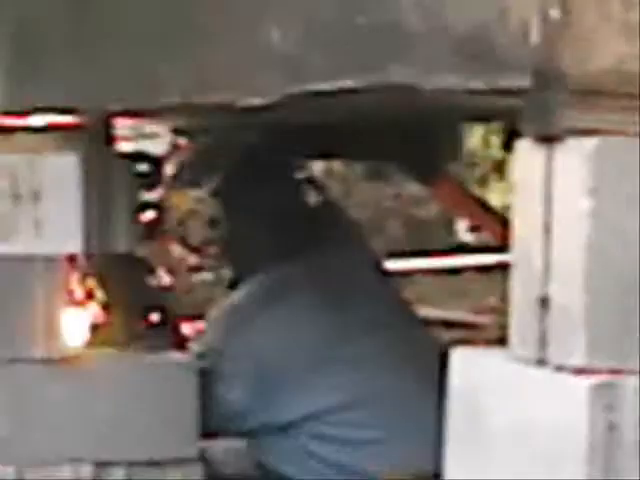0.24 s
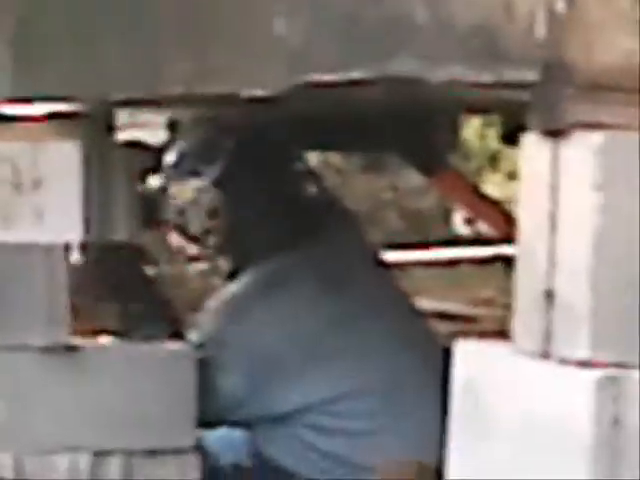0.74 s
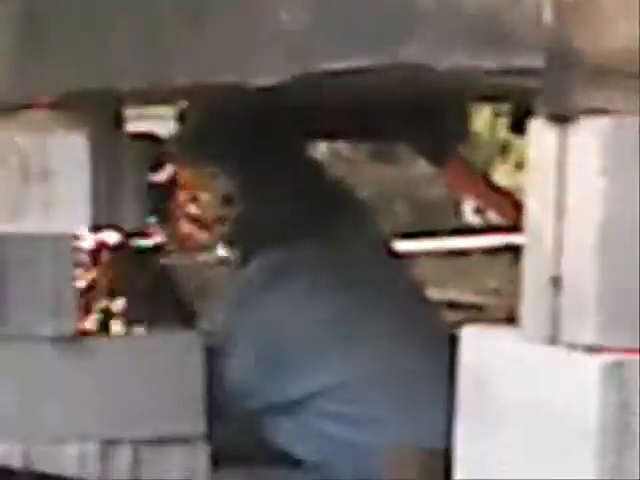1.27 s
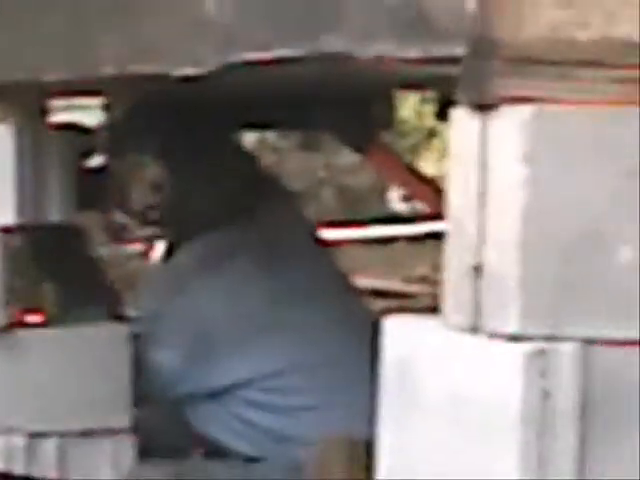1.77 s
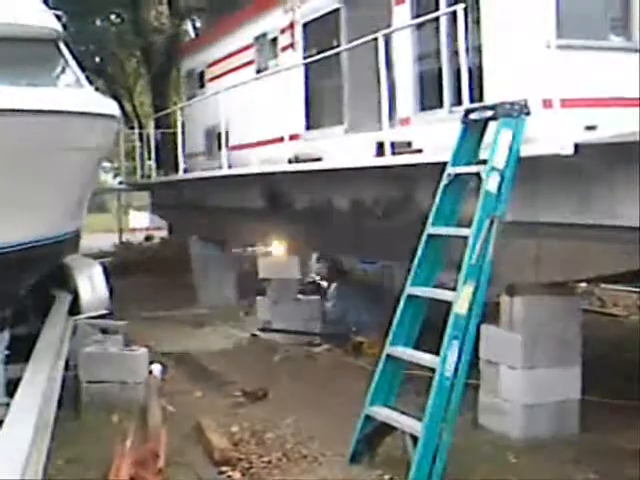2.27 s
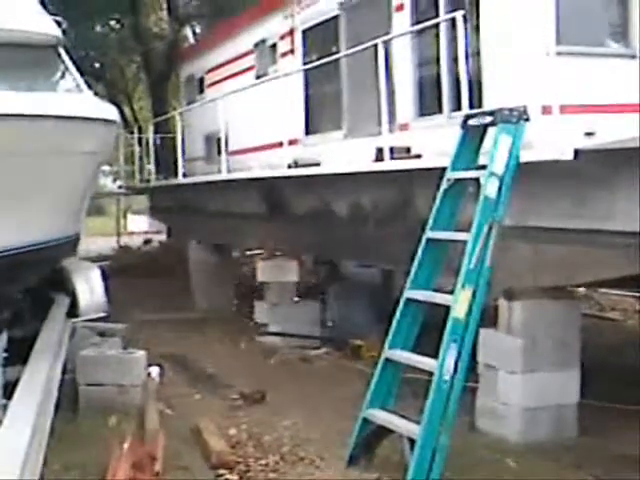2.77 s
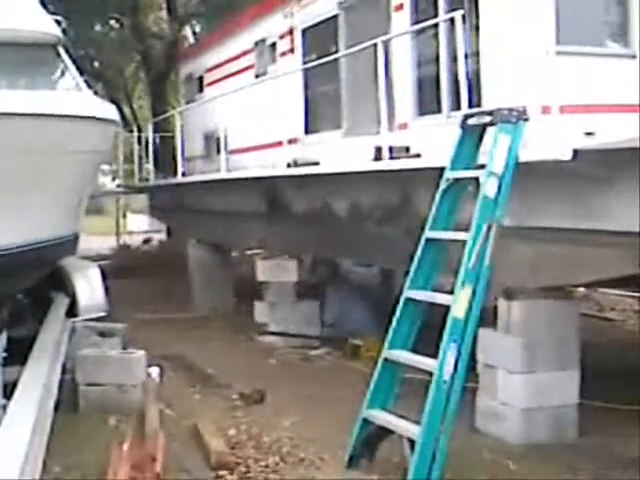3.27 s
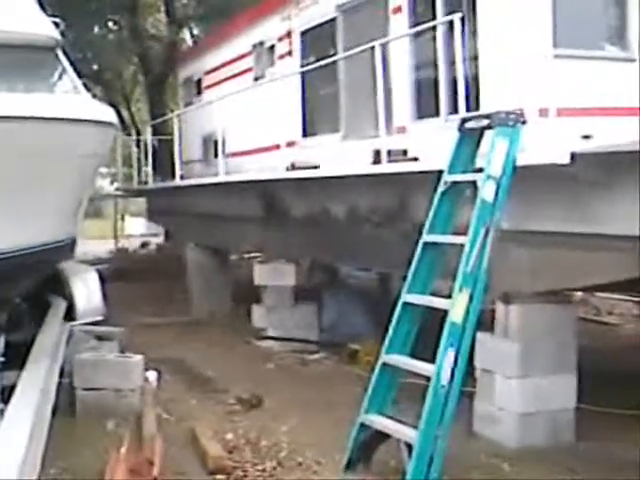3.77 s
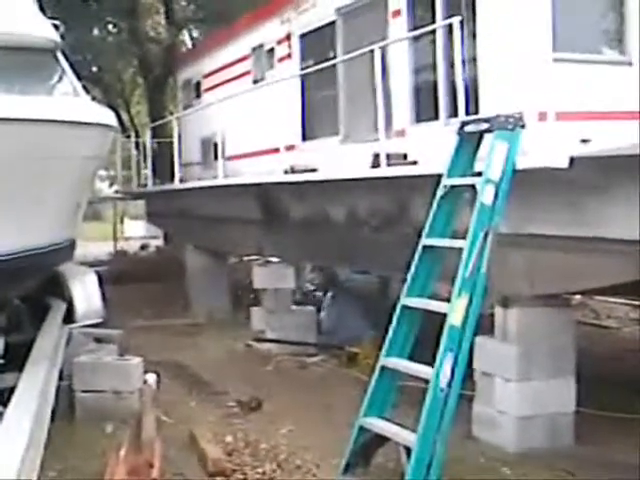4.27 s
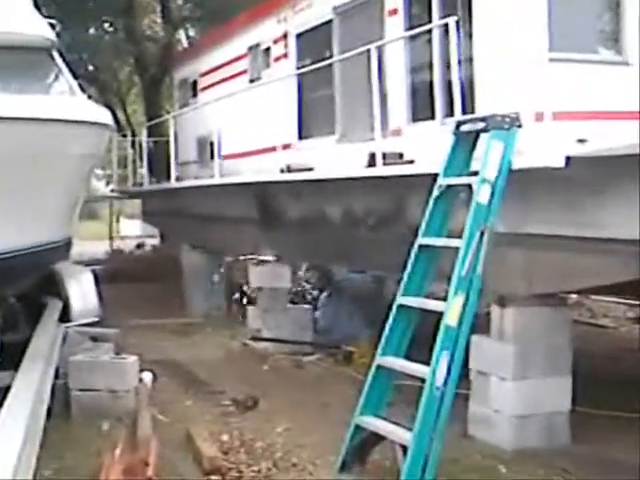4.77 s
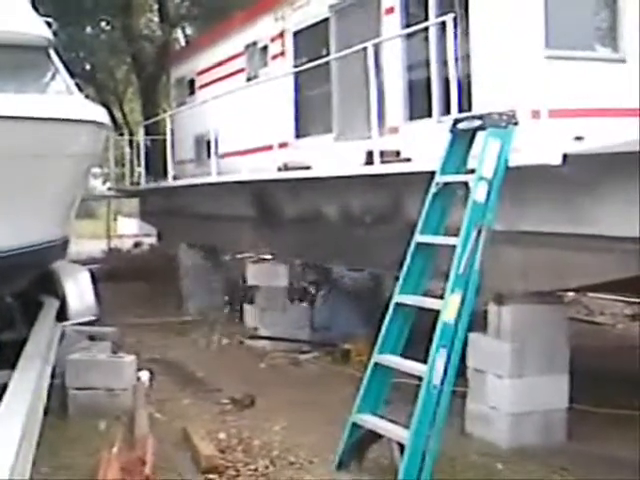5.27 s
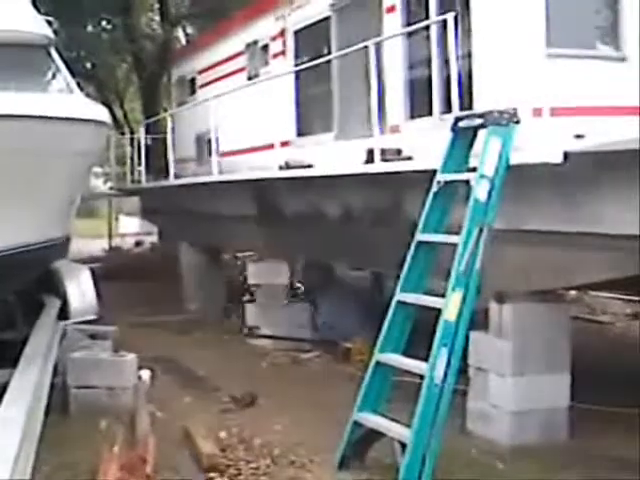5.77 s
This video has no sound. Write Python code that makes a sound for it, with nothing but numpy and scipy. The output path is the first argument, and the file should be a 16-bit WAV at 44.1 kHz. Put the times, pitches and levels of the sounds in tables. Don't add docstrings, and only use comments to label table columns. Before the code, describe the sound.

A single-cylinder engine drones loudly with whirring and clatter, a hard plastic clack, a brief near-silence, then the same engine quieter and farther off.

```python
import sys
import numpy as np
from scipy import signal
from scipy.fft import rfft, irfft, next_fast_len
from scipy.io import wavfile
from scipy.ndimage import uniform_filter1d

SR = 44100
rng = np.random.default_rng(int(sys.argv[2]) if len(sys.argv) > 2 else 0)


def wav_out(sig):
    wavfile.write(sys.argv[1], SR, np.round(np.clip(np.atleast_2d(sig).T, -1, 1) * 32767).astype(np.int16))


def gain_from_decibels(decibels):
    exponent = np.asarray(decibels, float) / 20
    return 10 ** exponent


N = 265482

# (frequency [Hz], density [dB per Hz])
ROAR_NEAR = [(20, -46.5), (75, -30.5), (140, -21), (220, -12), (340, -4.5), (450, -16.5), (600, -13.5),
             (820, -8.5), (1150, -16.5), (1400, -36), (1900, -57)]
ROAR_FAR = [(20, -27), (75, -20), (140, -22.5), (220, -11.5), (310, -5), (420, -8), (550, -14),
            (790, -11.5), (1080, -8), (1400, -19.5), (1900, -59)]
# (frequency [Hz], density [dB per Hz])
CLATTER_NEAR = [(710, -43.5), (1200, -4.5), (1380, -5.5), (1700, -4.5), (2070, -9.5), (2310, -7),
                (2650, -11.5), (3370, -11.5), (4000, -9.5), (5200, -60), (8800, -120)]
CLATTER_FAR = [(710, -46), (1200, -6), (1330, -29), (1420, -16), (1600, -10.5), (1910, -17), (2070, -9.5),
               (2200, -8), (3140, -16), (4000, -13.5), (5200, -66), (8800, -120)]
# (time [s], peak level [dB], decay by 60 dB [s], pitch [Hz], share of ring [0-1])
CLICKS = [
    (.228, -14, .01, 3000, .2),
    (.2638, -4, .018, 1700, .2),
    (.286, -16, .01, 3000, .2),
    (1.8785, -9, .012, 3900, 1),
    (1.8909, 8, .011, 3700, 1),
    (1.8909, 5, .014, 1600, 1),
    (1.8935, 7, .018, 1000, 1),
    (1.8985, -12, .035, 2800, 1),
    (2.2697, -21, .01, 2500, .3),
]
GAP = 2.0018, 2.1287
# (time [s], firing rate [1/s])
SPEED = [
    [(0.0, 28.55), (0.15, 28.95), (0.5, 30.25), (0.78, 30.25), (1.15, 29.3), (1.33, 29.35), (1.5, 30.85),
     (1.86, 31.15)],
    [(2.13, 30.0), (2.71, 29.6), (3.02, 31.15), (3.2, 31.1), (3.98, 30.15), (4.33, 28.85), (4.5, 28.9),
     (4.84, 30.45), (5.6, 29.4), (6.02, 29.95)],
]
# (time [s], level [dB])
LEVEL = [
    [(0.0, -19.5), (1.4, -20), (1.6, -19), (1.88, -18.5), (1.92, -21)],
    [(2.13, -28.5), (2.9, -26), (4.25, -26), (4.6, -24.5), (6.02, -24.5)],
]
# (multiple of firing rate [1], near loaded [dB], near free [dB], far loaded [dB], far free [dB])
EXHAUST = [(1, -33, -29, -34, -28), (2, -11, -8, -13, -10), (3, -15, -16, -16, -14), (4, -3, 0, -4, -1.5),
           (5, 0, -3, 0, -1), (6, -7, -1, -10, 0)]
# (multiple [1], near loaded [dB], near free [dB], far loaded [dB], far free [dB])
PANELS = [(7, -16, -11, -15, -11), (8, -14, 0, -10, -4), (9, -14, -17, -19, -12), (10, -8, -3, -9, -5),
          (11, -9, -11, -11, -13), (12, -7, -5, -12, -4), (14, -17, -13, -10, -4), (22, -12, -10, -19, -16),
          (23, -11, 2, -16, -7), (25, -9, -2, -12, -6), (27, -11, -11, -16, -16), (28, -5, -5, -15, -8),
          (29, -7, -13, -18, -10), (34, -13, -14, -16, -8)]
# (near loaded [dB], near free [dB], far loaded [dB], far free [dB])
OTHER_PANELS = (-15, -15, -17, -15)
# (best firing rate [1/s], loss 1 per s below [dB], loss 1 per s above [dB])
MUFFLER = (29.93, .3, 2.7)
GENERATOR_RING = (30.0, 6.5, 0.55)
COWL_RING = (30.3, 10.8, 3.5)
# (time [s], offset [full scale])
BIAS_SAG = [(1.889, 0), (1.9, -.085), (2.0, -.095)]
# (time [s], level [dB])
GAP_FADE = [(2.0, -38), (2.02, -57), (2.038, -64), (2.042, -130)]
# (frequency [Hz], density [dB per Hz])
GAP_COLOUR = [(50, 0), (900, 0), (2500, -18), (15000, -28)]

TOP_ORDER = 34
GENERATOR, COWL = 20, 26
HOLD_HZ = 8003.16


def engine(spot, roar_colour, clatter_colour, exhaust_db, generator_db, cowl_db, clatter_db, roar_db,
           beat, start):
    speed = curves(SPEED[spot])[0]
    level_db = curves(LEVEL[spot])[0]
    crank = 2 * np.pi * np.cumsum(speed) / SR - start
    stroke = gain_from_decibels(0.78 * wobble(30))
    firing = 1 + beat * np.cos(crank - .4) + 0.087 * np.cos(2 * crank)
    pulses = unit(exhaust(spot, speed, crank) * stroke)
    pulses *= gain_from_decibels(exhaust_db + tuned_db(speed, MUFFLER))
    body = unit(panels(spot, speed, crank) * stroke) + gain_from_decibels(roar_db) * roar(roar_colour, firing)
    whine = whines(speed, crank, generator_db, cowl_db)
    ticks = gain_from_decibels(clatter_db) * clatter(clatter_colour, firing)
    return gain_from_decibels(level_db) * (pulses + whine + gain_from_decibels(3.5) * unit(body) + ticks)


def exhaust(spot, speed, crank):
    opening = np.clip((speed - 29.4) / 1.7, 0, 1)
    out = np.zeros(N)
    for k, *levels in EXHAUST:
        loaded_db, free_db = levels[2 * spot:2 * spot + 2]
        db = loaded_db + opening * (free_db - loaded_db)
        if k < 4:
            lead = .4 + 2.4 * opening - 1.6 * (k == 3)
        else:
            lead = -1.5 * max(k - 5, 0)
        strength = gain_from_decibels(db + .5 * wobble(6))
        out -= strength * np.cos(k * crank + lead + .15 * wobble(5))
    return out


def panels(spot, speed, crank):
    free = np.clip((speed - 30.3) / .6, 0, 1)
    favoured = {k: levels for k, *levels in PANELS}
    out = np.zeros(N)
    for k in range(7, TOP_ORDER + 1):
        if k in (GENERATOR, COWL):
            continue
        loaded_db, free_db = favoured.get(k, OTHER_PANELS)[2 * spot:2 * spot + 2]
        db = loaded_db + free * (free_db - loaded_db)
        spread = np.minimum((k - 6) / 4, 3)
        lag = spread * rng.standard_normal() - 1.5
        strength = gain_from_decibels(1.15 * db + 2.5 * wobble(6))
        out -= strength * np.cos(k * crank + lag + .35 * wobble(6))
    return out / np.sqrt(np.abs(uniform_filter1d(out ** 2, size=SR // 3)))


def whines(speed, crank, generator_db, cowl_db):
    out = np.zeros(N)
    for k, whine_db, ring in [(GENERATOR, generator_db, GENERATOR_RING), (COWL, cowl_db, COWL_RING)]:
        db = whine_db + tuned_db(speed, ring)
        out += gain_from_decibels(db + 1.62 * wobble(7.2)) * np.sin(k * crank + 0.2 * wobble(7.9))
    return out


def button():
    out = np.zeros(N)
    t = np.arange(SR // 10) / SR
    for s, db, t60, hz, ring in CLICKS:
        crack = uniform_filter1d(rng.standard_normal(len(t)), size=6)
        crack = unit(crack - uniform_filter1d(crack, size=100))
        decay = gain_from_decibels(db - 60 * t / t60)
        out[round(s * SR):][:len(t)] += decay * (ring * np.sin(2 * np.pi * hz * t) + 0.56 * crack)
    return out


def clatter(colour, firing):
    return unit(gain_from_decibels(0.22 * wobble(120)) * firing * noise(colour))


def roar(colour, firing):
    return unit(gain_from_decibels(1.1 * wobble(40)) * firing * noise(colour))


def tuned_db(speed, ring):
    best, below_db, above_db = ring
    return -np.where(speed < best, below_db, above_db) * (speed - best) ** 2


def noise(spectrum):
    hz, db = np.transpose(spectrum)

    def response(f):
        return gain_from_decibels(np.interp(np.log(f + 1), np.log(hz + 1), db))

    return unit(filtered(rng.standard_normal(N), response))


def filtered(x, response):
    m = next_fast_len(N + SR // 2)
    return irfft(rfft(x, m) * response(np.fft.rfftfreq(m, 1 / SR)), m)[..., :N]


def wobble(rate):
    knots = rng.standard_normal(int(N * rate / SR) + 2)
    return np.interp(np.arange(N) * rate / SR, np.arange(len(knots)), knots)


def curves(rows):
    s, *cols = np.transpose(rows)
    return [np.interp(np.arange(N) / SR, s, c) for c in cols]


def unit(x):
    return x / np.sqrt(np.mean(x ** 2) + 1e-20)


def scene():
    near = engine(0, ROAR_NEAR, CLATTER_NEAR, exhaust_db=2.5, generator_db=-7.5, cowl_db=0,
                  clatter_db=-9, roar_db=-3.5, beat=.08, start=1.7)
    far = engine(1, ROAR_FAR, CLATTER_FAR, exhaust_db=3.0, generator_db=0.0, cowl_db=-1.2,
                 clatter_db=-7.5, roar_db=-3.5, beat=.06, start=2.3)
    heard = np.where(np.arange(N) / SR < GAP[0], near, far)
    return (heard + button())[None]


def roll_off(x):
    return signal.sosfilt(signal.butter(12, 15520, fs=SR, output="sos"), x)


def record(dry):
    t = np.arange(N) / SR
    x = filtered(dry, lambda hz: 1 / np.sqrt(1 + (hz / 3900) ** 24))
    sag = np.interp(t, *np.transpose(BIAS_SAG), right=0)
    x = np.clip(x - .009 + .002 * wobble(8) + sag, -.95, .95)
    held = x[:, (np.floor(t * HOLD_HZ) * SR / HOLD_HZ).astype(int)]
    in_gap = (t >= GAP[0]) & (t < GAP[1])
    faint_noise = gain_from_decibels(curves(GAP_FADE)[0]) * noise(GAP_COLOUR)
    return roll_off(np.where(in_gap, faint_noise, held))


dry = scene()
out = record(dry)
wav_out(out)
```